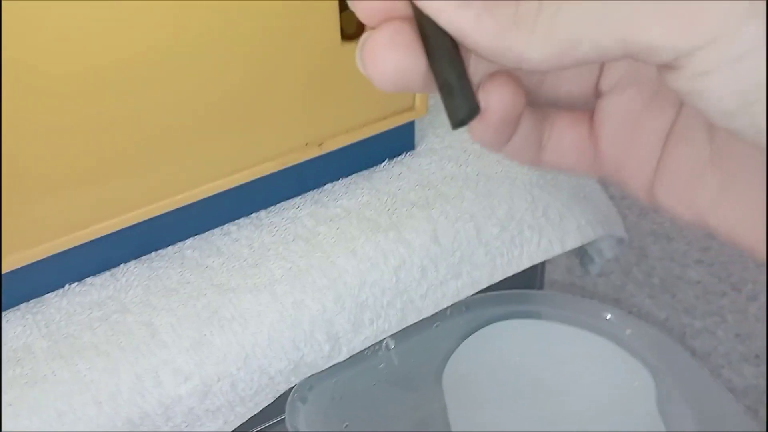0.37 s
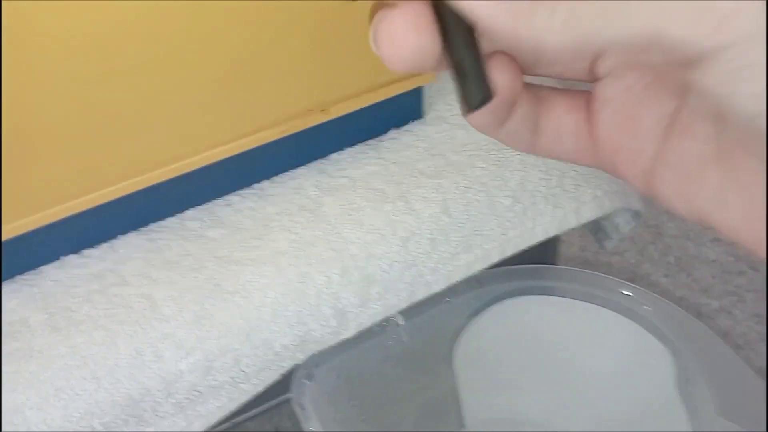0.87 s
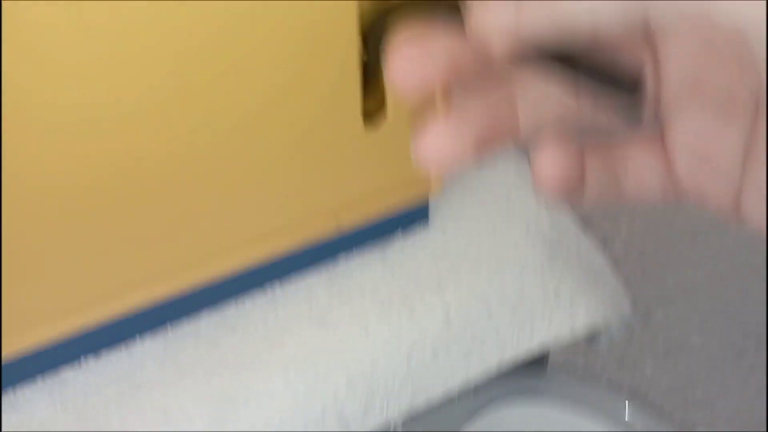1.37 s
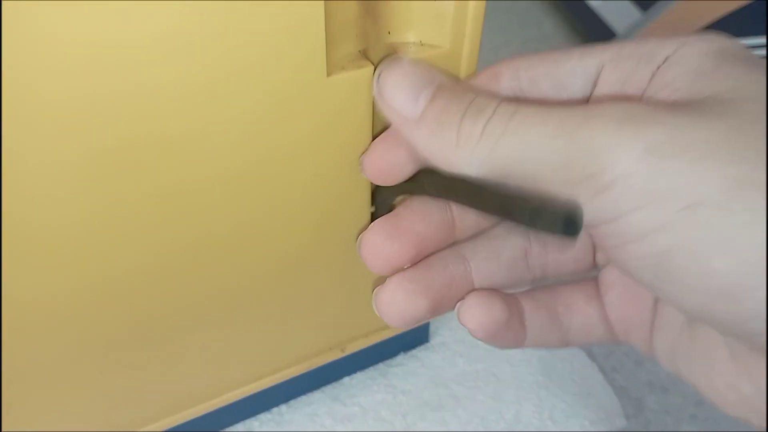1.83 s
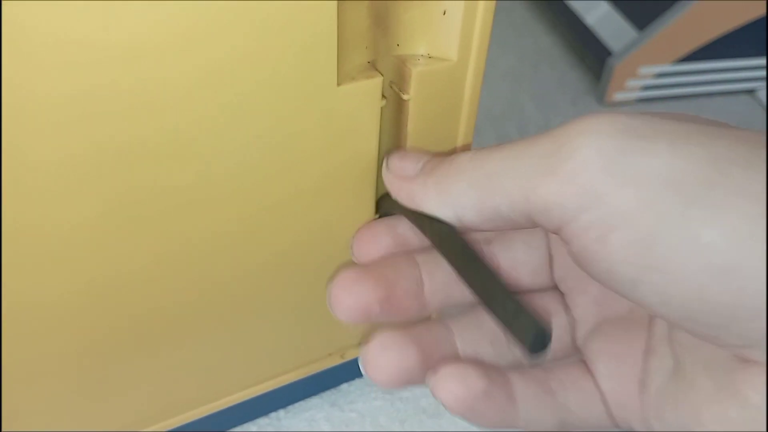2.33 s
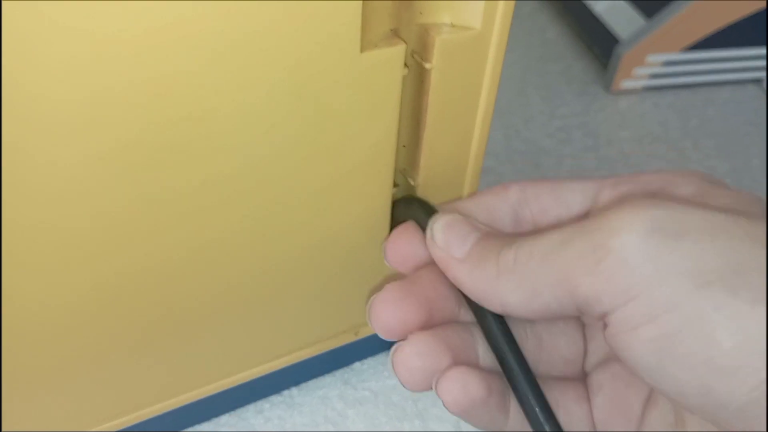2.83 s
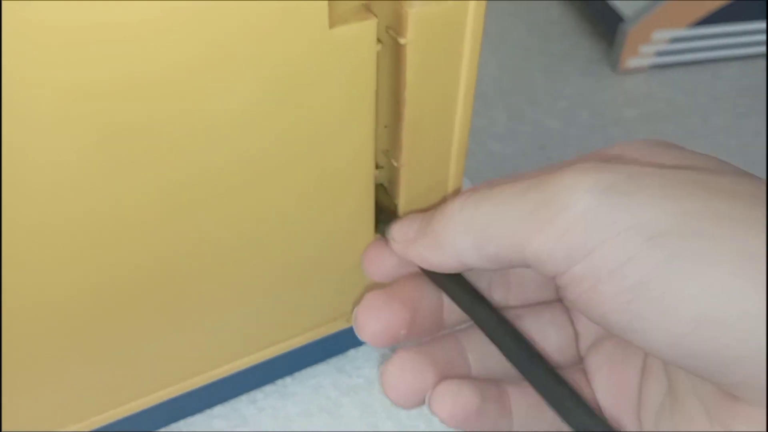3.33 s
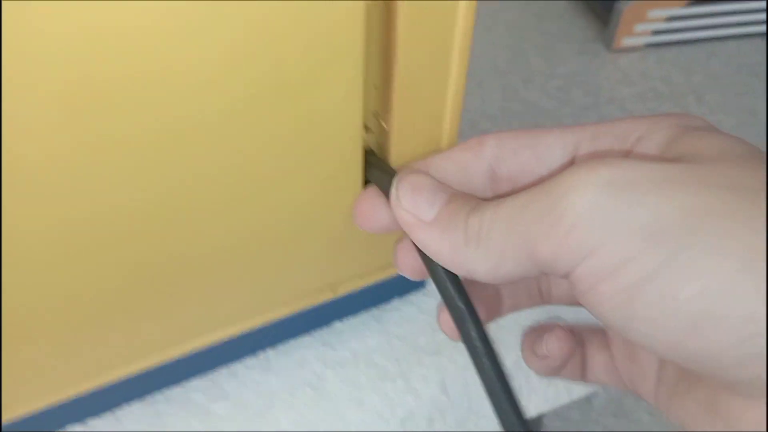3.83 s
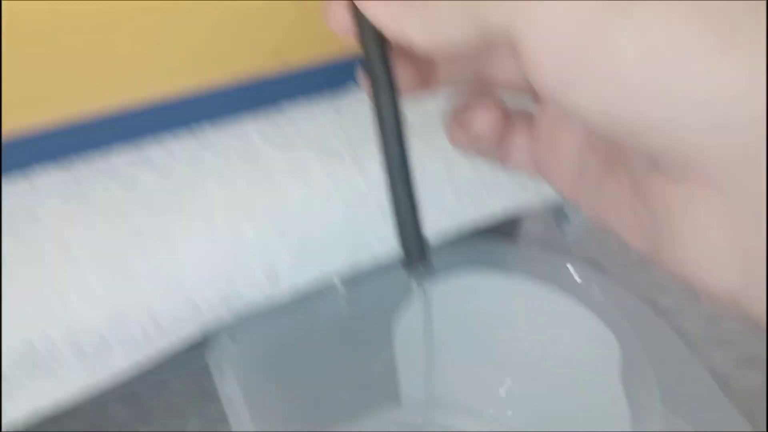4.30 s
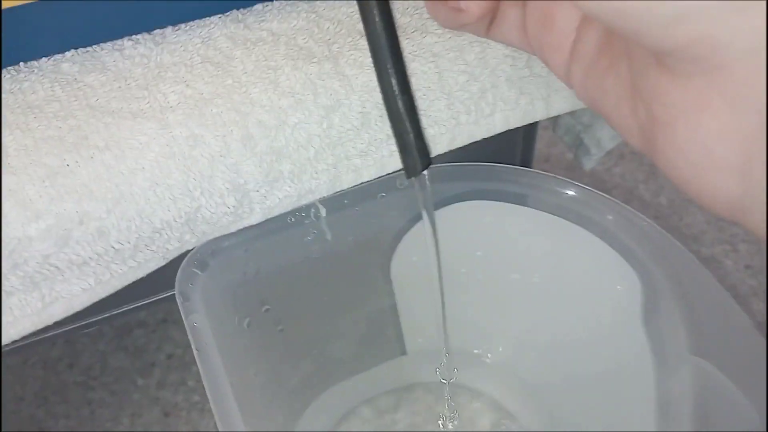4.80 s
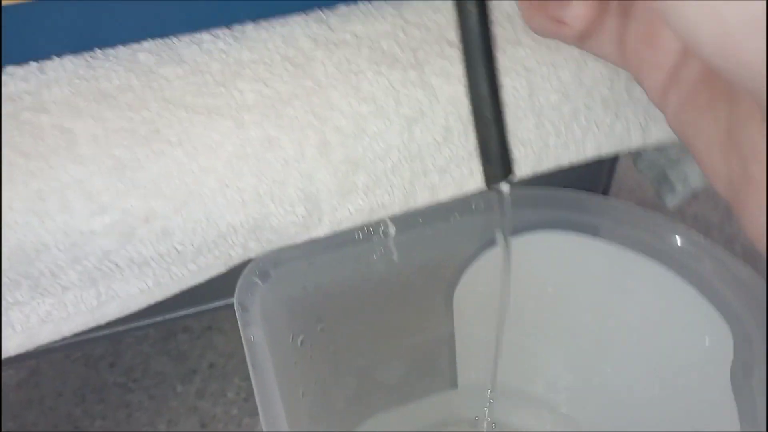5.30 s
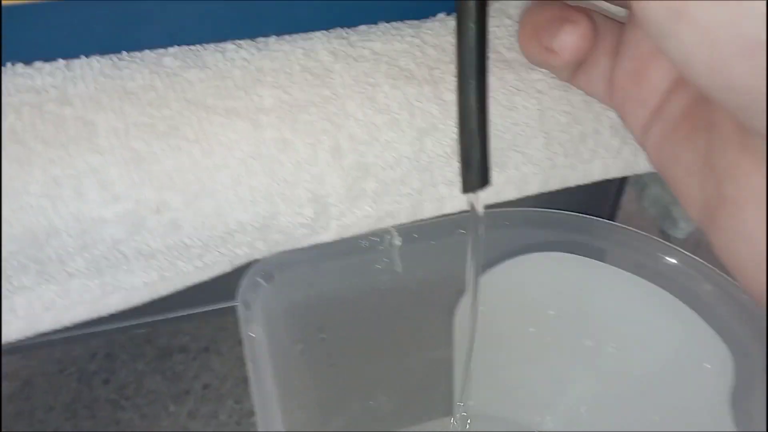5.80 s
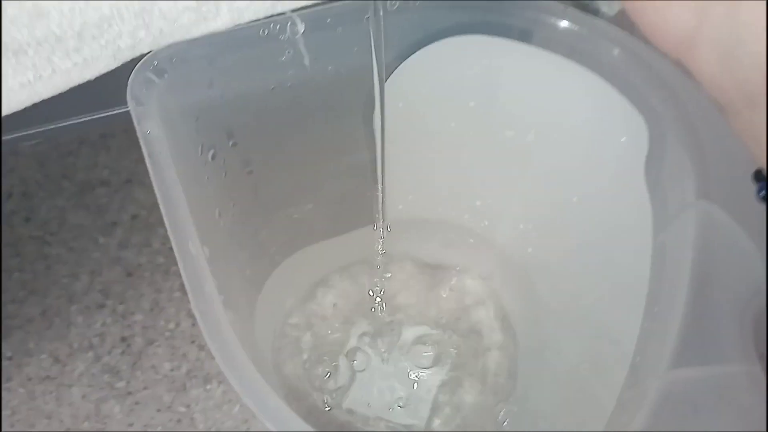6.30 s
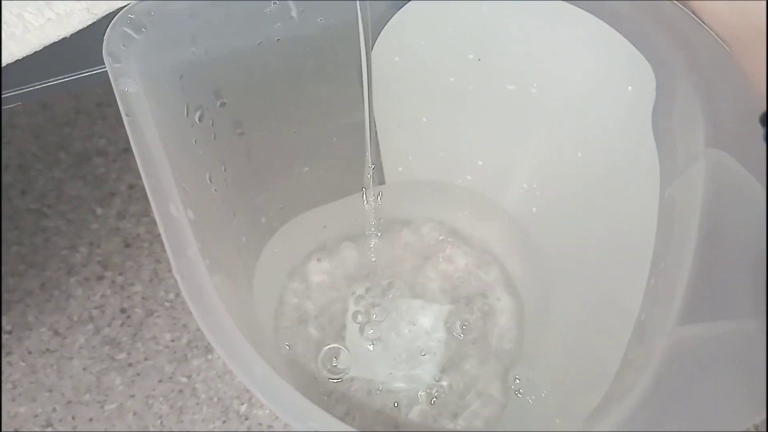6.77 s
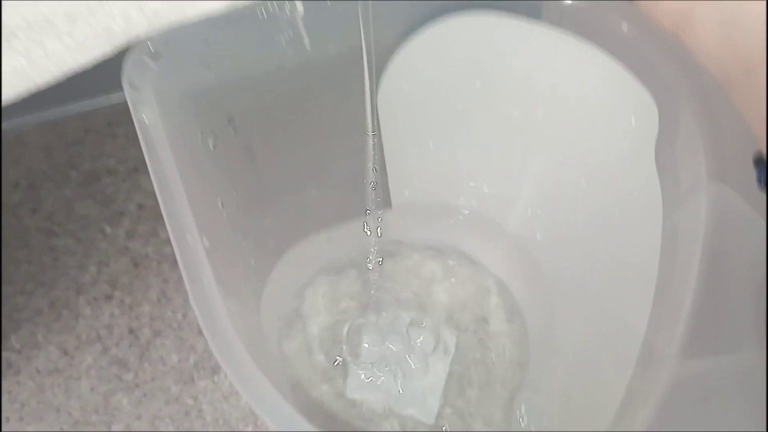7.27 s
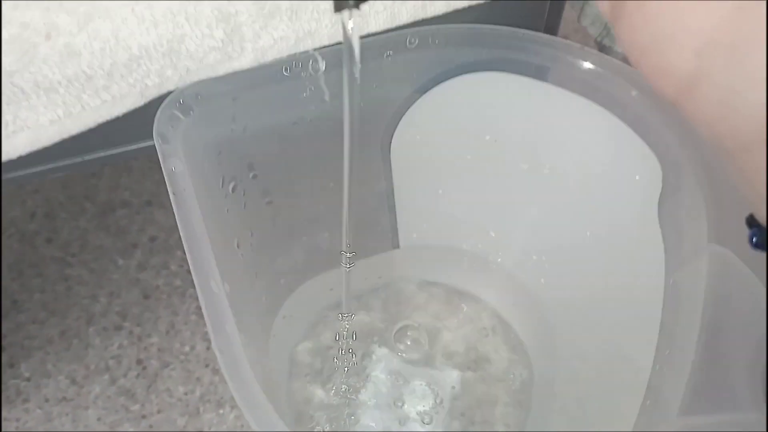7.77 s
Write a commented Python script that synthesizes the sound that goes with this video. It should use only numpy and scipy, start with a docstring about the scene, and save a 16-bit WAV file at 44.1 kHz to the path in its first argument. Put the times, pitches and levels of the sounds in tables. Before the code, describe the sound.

Faint low hum and soft skin rustles come first, with small hollow taps as a hose touches plastic. Then water abruptly starts trickling into a nearly empty plastic jug, irregular and gurgling, with many short upward-chirping bubbles, sharp little splashes and light hissing spray. It grows fuller and busier between six and seven seconds. Recorded very close in a small quiet room, slightly stronger on the left.

```python
"""A low, wavering room hum and a hand shifting on a hose, until a thin stream of water falls into a plastic jug.
Close under the phone's two microphone ports, trapped bubbles ring as gliding sines, most of them rising,
and drops spit as short bursts of filtered noise. Crowds of small bubbles, fine spray and a grainy fizz
fill the gaps; the jug's air column colours the water, and jug walls and quiet room prolong it."""
import sys
import numpy as np
from scipy import signal
from scipy.fft import rfft, irfft
from scipy.io import wavfile
from scipy.ndimage import uniform_filter1d

SR = 44100
rng = np.random.default_rng(int(sys.argv[2]) if len(sys.argv) > 2 else 0)


def volts_from_db(level):
    """Convert decibel levels to linear amplitude ratios."""
    exponent = np.asarray(level, float) / 20
    return 10 ** exponent


def wav_record(signal):
    """Record a signal, one row per channel, as 16-bit PCM in the file named by sys.argv[1]."""
    frames = np.transpose(np.atleast_2d(signal))
    bounded = np.clip(frames, -1, 1)
    # unit amplitude maps onto the largest positive 16-bit level
    quanta = np.round(bounded * 32767).astype(np.int16)
    wavfile.write(sys.argv[1], SR, quanta)


N = 347949
T = np.arange(N) / SR  # seconds

# Room air between the hum tones. Each row: frequency in Hz, relative spectrum level in dB.
ROOM_SPECTRUM = [(18, -36.5), (34, -20.5), (55, -16.5), (85, -4.5), (154, -3), (250, -8), (400, -14),
                 (620, -24), (950, -33), (1920, -35.5), (7000, -42.5), (11000, -40.5), (15000, -44.5)]
# The hum's slow wavering. Each row: time in seconds, lower tone in dB, upper tone in dB, before a 4 dB trim.
HUM_LEVELS = [(0, -81.5, -65.5), (.8, -88.5, -61), (1.2, -67.5, -55.5), (1.5, -55, -53),
              (1.85, -61.5, -64.5), (2.7, -65.5, -85), (2.9, -56, -61), (3.6, -54.5, -69.5),
              (4.0, -57, -55.5), (4.6, -60, -63), (5.0, -65, -58.5), (7.89, -69, -87.5)]
# Centre pitches of the lower and the upper hum tone, in Hz.
HUM_PITCHES = (76.11, 152.17)
# Skin and cloth rubbing near the phone. Each row: middle in seconds, level in dB, half length in seconds.
RUB_EVENTS = [(0.034, -64.5, 0.01599), (0.41, -75.5, 0.128), (1.193, -71, 0.004164), (1.332, -70.5, 0.0437),
              (1.555, -54, 0.001804), (1.599, -70.5, 0.06547), (2.141, -68.5, 0.05554),
              (2.295, -67.5, 0.08595), (2.671, -76, 0.0777), (2.97, -71.5, 0.0359), (3.291, -70, 0.1297),
              (3.489, -68.5, 0.003807), (3.86, -74, 0.1437)]
# The hose bumping the plastic housing. Each row: start in seconds, level in dB, contact pitch in Hz.
BUMP_EVENTS = [(1.556, -50.5, 375.2), (1.61, -54, 299.7), (1.783, -53, 434.2), (2.976, -44, 915.6),
               (2.3, -55, 515.9), (2.99, -51.5, 342.4), (3.306, -54, 443.8), (3.365, -52.5, 251.1),
               (3.484, -38, 352.7), (3.556, -50.5, 283.5)]
# Ringing modes of the housing. Each row: pitch in Hz, relative level in dB, 60 dB fade in seconds.
HOUSING_MODES = [(151.88, 10.5, 0.08963), (278.17, 0.5, 0.17913), (362.16, -7.5, 0.0688),
                 (457.92, -10, 0.1238), (526.74, -0.5, 0.05507), (760, -0.5, 0.02302),
                 (1683.5, -19.5, 0.2517), (1771.3, -20.5, 0.244)]
# The steady patter of the stream. Each row: time in seconds, small bubbles in dB, fine spray in dB,
# low slosh in dB, all ahead of the jug and the echoes.
STREAM_LEVELS = [(4.1, -83, -57, -70.5), (4.5, -63, -56, -71.5), (6.4, -60.5, -53.5, -67.5),
                 (7.4, -63, -57, -64), (7.89, -59.5, -55, -57.5)]
# Drops that spit on landing. Each row: time in seconds, level in dB before a 9.5 dB trim, centre pitch in Hz.
SPIT_EVENTS = [(4.0991, -27.5, 7136), (4.3, -32, 8118), (4.336, -38, 11720), (4.3545, -22, 8722),
               (4.364, -30.5, 9500), (4.3869, -23.5, 10650), (4.792, -37, 7593), (4.936, -25, 12730),
               (4.9666, -24, 9185), (5.073, -25.5, 9934), (5.111, -31.5, 6554), (5.131, -22.5, 10200),
               (5.497, -31.5, 9006), (5.6, -25.5, 9999), (5.68, -30.5, 10490), (5.709, -18, 10470),
               (5.8101, -24, 8650), (5.8778, -26.5, 9530), (5.955, -27, 10990), (6.097, -21, 11290),
               (6.199, -27, 12000), (6.375, -22.5, 10780), (6.409, -30, 7136), (6.4598, -20, 11920),
               (6.5049, -17.5, 9563), (6.569, -25.5, 9954), (6.598, -23.5, 11500), (6.704, -20.5, 7195),
               (6.7961, -27.5, 13010), (6.8078, -11.5, 9691), (6.9, -27.5, 9996), (6.9452, -18, 10850),
               (7.0228, -20, 12370), (7.0487, -25.5, 12550), (7.077, -23, 10530), (7.1527, -28, 10550),
               (7.172, -28, 12180), (7.244, -30.5, 10580), (7.2964, -32.5, 12980), (7.371, -21, 7756),
               (7.43, -24, 9900), (7.454, -24.5, 9700), (7.47, -17.5, 12060), (7.7138, -26.5, 10620),
               (7.809, -21.5, 7945)]
# The loudest air bubbles trapped by the stream. Each row: start in seconds, level in dB ahead of the jug,
# first pitch in Hz, rise in octaves per second.
BUBBLE_EVENTS = [(4.1009, -25.5, 4037, -24.5), (4.1, -22.5, 2981, 54), (4.16, -50, 1385, 4),
                 (4.163, -32, 3276, 22), (4.268, -39.5, 1155, 7.5), (4.3348, -40.5, 1441, 2),
                 (4.3876, -42.5, 1444, 0), (4.3975, -37, 5501, -10.5), (4.4608, -35.5, 899.5, 15),
                 (4.477, -39, 879.3, 9), (4.495, -53, 1890, 5.5), (4.524, -42.5, 1401, 9),
                 (4.546, -49, 1894, 16), (4.5612, -35, 2686, 27), (4.5104, -43, 888, 22.5),
                 (4.5362, -42.5, 1146, 5.5), (4.6429, -35.5, 821.3, 6), (4.6755, -36, 843, 6.5),
                 (4.7225, -40.5, 1084, 21.5), (4.7915, -32, 756.7, 17), (4.8253, -33.5, 817.7, 71.5),
                 (4.843, -40, 1313, 14), (4.862, -40.5, 1416, 4), (4.9267, -32.5, 2723, 0),
                 (4.9513, -30.5, 1376, 19.5), (5.0035, -36, 1354, 28.5), (5.0252, -36, 4426, 23),
                 (5.0238, -21.5, 3551, 25), (5.029, -31.5, 2733, -2.5), (5.0571, -38.5, 1105, 11),
                 (5.0966, -41.5, 1072, 7), (5.14, -43.5, 911.1, 2.5), (5.167, -30, 1018, -9),
                 (5.168, -33.5, 2797, 3.5), (5.2326, -31, 884.4, 40), (5.3454, -40.5, 1195, -6),
                 (5.3947, -35.5, 1060, 2), (5.436, -40, 868.8, 40), (5.4555, -38.5, 1016, 0.5),
                 (5.513, -40, 1330, -7), (5.5429, -36.5, 2684, 35), (5.6002, -35.5, 3646, 8.5),
                 (5.5992, -44, 1051, 10), (5.6209, -33, 1007, 15.5), (5.6488, -41, 1176, 29),
                 (5.761, -38.5, 3927, -0.5), (5.761, -41.5, 857.4, 6), (5.8091, -28, 3634, 54),
                 (5.813, -39, 1181, 41), (5.8468, -34, 830.1, 3.5), (5.878, -33.5, 832.8, 41),
                 (5.8798, -23, 2525, 69), (5.9068, -35.5, 811.1, 8), (5.9536, -39.5, 1476, -2.5),
                 (5.9602, -34, 1299, 29), (5.9919, -38, 1265, 7), (6.0257, -36.5, 3840, 8),
                 (6.038, -30.5, 1103, 24), (6.0641, -40, 987.6, 13), (6.1603, -32.5, 859.5, 11.5),
                 (6.1612, -31, 2240, 85), (6.141, -46, 970.2, 26.5), (6.1886, -37.5, 862.2, 0.5),
                 (6.2415, -41.5, 833.2, -2), (6.2724, -36, 934.8, -2.5), (6.311, -35.5, 3658, 26),
                 (6.3416, -30.5, 958.4, 11), (6.447, -39.5, 824.1, 2), (6.4415, -31.5, 3888, 11),
                 (6.4599, -31.5, 5428, 17.5), (6.4826, -32, 808.3, 20.5), (6.5763, -36, 764.8, 2),
                 (6.6012, -36.5, 760, 5), (6.6088, -31.5, 3793, 15), (6.6376, -25, 863, 31.5),
                 (6.6552, -42, 928.6, -3), (6.6973, -31, 2864, 53.5), (6.698, -35, 2095, 48.5),
                 (6.7135, -25.5, 6526, 11), (6.7147, -29, 1042, 28.5), (6.7975, -17.5, 5145, 20),
                 (6.8404, -27.5, 807.2, 1), (6.8638, -25.5, 882.3, 10), (6.9649, -30.5, 1048, 1.5),
                 (6.9849, -30, 970.1, 3), (7.0206, -35, 955.8, 33), (7.0213, -34, 3089, 16),
                 (7.0311, -29, 883.6, 25), (7.0548, -40, 966.8, 39), (7.0781, -33, 925.4, 5.5),
                 (7.11, -36, 955.2, 0), (7.195, -46, 937.6, 2.5), (7.1996, -41, 5281, 1),
                 (7.226, -39, 911.2, 10.5), (7.247, -43, 901.5, 7.5), (7.2967, -39.5, 2426, 37.5),
                 (7.2834, -32, 794.7, 40), (7.3096, -37, 943.8, 9.5), (7.371, -31, 2219, 16),
                 (7.3837, -37, 730.4, 34.5), (7.3984, -38, 992.6, -1), (7.4536, -36.5, 910.1, 7.5),
                 (7.5138, -35, 904.2, 57), (7.5438, -36.5, 4945, 0), (7.585, -37.5, 1984, -3),
                 (7.556, -35.5, 2286, -1), (7.6178, -34.5, 1277, -6.5), (7.6228, -38.5, 1929, 18.5),
                 (7.644, -40, 1144, -20), (7.686, -47, 840, -4), (7.7134, -40, 829.5, 5),
                 (7.7141, -23.5, 2257, 5.5), (7.7427, -29, 834.4, 37.5), (7.7859, -32.5, 930.5, 32.5),
                 (7.821, -38, 1031, 8), (7.851, -44, 976.6, -1.5), (7.875, -45, 991.7, 2)]
# Resonances of the air column above the water. Each row: pitch in Hz, width in Hz, level in dB.
JUG_MODES = [(628.2, 87.1, 2), (2114.3, 359.07, 0.5), (5157.5, 730.8, 2)]

ROOM_DB = -63
TAIL_T60_S, TAIL_DB = 0.22, -15  # the room's echoes
TAIL_DAMP = 0.69357  # one-pole dulling of the room's tail, 0-1
TICK_HZ, TICK_DB, TICK_T60_S = 1513.3, -16, 0.02462  # dry tick that opens each bump
SLOSH_WANDER_DB = 5
FIZZ_DB, FIZZ_GRAIN_DB = -7.5, 4.5  # level relative to the spray; spread of its grain
SWARM_S = 0.04  # mean lag of small events behind a loud bubble or drop
PINGS_DB = -1  # the smallest, highest bubbles, relative to the small ones
RING_TURNS = 73.827  # turns in which a 1 kHz bubble fades 60 dB
TURNS_FALL = 0.11402  # higher bubbles ring fewer turns: power of pitch over 1 kHz
TOP_HZ = 14200  # above this the phone hears little


def unit(x):
    """Scales a sound to rms 1."""
    return x / np.sqrt(np.mean(x ** 2))


def curves(table):
    """Draws each column of a table along the time axis; very quiet before its first row."""
    s, *columns = np.transpose(table)
    return [np.interp(T, s, c, left=-140) for c in columns]


def peak(x, hz, width):
    """Two-pole resonance, gain 1 at the centre."""
    b, a = signal.iirpeak(min(hz, .4 * SR), hz / width, fs=SR)
    return signal.lfilter(b, a, x)


def shaped(points):
    """Noise with the spectrum of (Hz, dB) points, joined over log frequency."""
    hz, db = np.transpose(points)
    f = np.arange(N // 2 + 1) * SR / N + 1
    gain = volts_from_db(np.interp(np.log(f), np.log(hz), db))
    return unit(irfft(rfft(rng.standard_normal(N)) * gain, N))


def walk(rate):
    """Slow chance, spread 1, heading for a new value rate times a second."""
    k = int(SR / rate)
    steps = np.repeat(rng.standard_normal(N // k + 1), k)
    return unit(uniform_filter1d(steps, k)[:N])


def add(out, s, sound):
    """Mixes a short sound in at time s."""
    i = int(s * SR)
    part = sound[..., :N - i]
    out[..., i:i + part.shape[-1]] += part


def room():
    """Two wavering hum tones alike at both ports, a drifting low murk half alike, a thin hiss unrelated."""
    tones = np.zeros(N)
    for hz, db in zip(HUM_PITCHES, curves(HUM_LEVELS)):
        turns = hz * np.cumsum(1 + 0.008429 * walk(3.3)) / SR
        tones += volts_from_db(db - 4.0) * np.sin(2 * np.pi * turns)
    side = shaped(ROOM_SPECTRUM)
    # less difference between the ports in the lows
    side = side - 0.6431 * peak(side, 170.0, 700.0)
    air = shaped(ROOM_SPECTRUM) + side * np.array([[1], [-1]])
    drift = (volts_from_db(2.5 * walk(4)) - 1) * peak(air, 400., 500.)
    return tones + volts_from_db(ROOM_DB) * (air + drift)


def echoes(x, t60, db, start_s, damp):
    """A dense fading tail, different at each port and duller than the direct sound."""
    t = np.arange(int(t60 * SR)) / SR
    dull = signal.lfilter([1], [1, -damp], rng.standard_normal((2, len(t))))
    tail = dull * volts_from_db(-60 * t / t60) * (t > start_s)
    tail = tail / np.sqrt(np.sum(tail ** 2, axis=1, keepdims=True))
    return volts_from_db(db) * signal.fftconvolve(x, tail, axes=1)[:, :N]


def rubbing():
    """Grainy friction hiss in three broad bands that swells and fades with each rub."""
    grain = rng.standard_normal((2, N)) * volts_from_db(2.809 * np.array([walk(210), walk(410)]))
    swell = sum(volts_from_db(db) * np.exp(-((T - s) / half_s) ** 2) for s, db, half_s in RUB_EVENTS)
    high = peak(grain, 9448.0, 4200.0)
    middle = 1.1925 * peak(grain, 1922.4, 4284.0)
    low = 4.981 * peak(grain, 521.2, 200.8)
    return swell * unit(high + middle + low)


def bumps():
    """Each bump ticks and rings the housing's modes, most those near the pitch of its contact."""
    out = np.zeros(N)
    t = np.arange(8192) / SR
    for s, db, contact_hz in BUMP_EVENTS:
        ring = np.zeros(len(t))
        for hz, mode_db, t60 in HOUSING_MODES:
            off_contact_db = 7.938 * np.log2(hz / contact_hz) ** 2
            ring += volts_from_db(mode_db - off_contact_db - 60 * t / t60) * np.sin(2 * np.pi * hz * t)
        tick = unit(peak(rng.standard_normal(len(t)), TICK_HZ, 513.0))
        ring += volts_from_db(TICK_DB - 60 * t / TICK_T60_S) * tick
        add(out, s, volts_from_db(db) * ring * (1 - np.exp(-t * contact_hz)))
    return out


def slosh():
    """The churned water sloshes low against the plastic: noise in one low resonance."""
    return unit(peak(rng.standard_normal(N), 294.97, 133.8))


def fizz():
    """Countless tiny bubbles merge into a fine, grainy hiss that fills the gaps."""
    grain = rng.standard_normal((2, N)) * volts_from_db(FIZZ_GRAIN_DB * walk(270))
    return unit(peak(grain, 2014.6, 2000.0) + 1.418 * peak(grain, 13045.0, 6427.0))


def swarm(count):
    """Times for small events, which crowd behind the loud bubbles and drops as the stream breaks into gulps."""
    pick, lag = rng.random((count, 2)).T
    starts = np.array([row[0] for row in BUBBLE_EVENTS + SPIT_EVENTS])
    leaders = starts[(pick * len(starts)).astype(int)]
    return np.clip(leaders - SWARM_S * np.log(1 - lag), 0, T[-1])


def spit(db, hz, rise_s, width, broad):
    """A drop bursts into a few milliseconds of crackle: a ring at its own pitch over a broad hiss."""
    t = np.arange(768) / SR
    same, left, right = rng.standard_normal((3, len(t)))
    # the part both ports share reaches the right one two samples later
    ears = np.array([same + 2.6114 * left, np.roll(same, 2) + 3.307 * right])
    ring = unit(peak(peak(ears, hz, width), hz, width))
    crackle = ring + broad * unit(peak(ears, 7786.0, 13513.0))
    fade = (t / rise_s * np.exp(1 - t / rise_s)) ** 1.075
    # the left port faces the jug and hears more of the highest pitches
    pan_db = 0.779 + 20.88 * max(np.log2(hz / 9366.0), 0)
    return volts_from_db(db + np.array([[pan_db], [-pan_db]]) / 2) * fade * crackle


def spray(count):
    """Many fainter drops of scattered pitch and length, crowding behind the loud events."""
    out = np.zeros((2, N))
    for s, (pitch, size, length) in zip(swarm(count), rng.random((count, 3))):
        db = 19.502 * size ** 2.159
        hz = 5256.9 * 2 ** (1.35 * pitch ** .7)
        rise_s = 0.0004344 + 0.0035173 * length ** 2
        add(out, s, spit(db, hz, rise_s, 2460.0, 0.4254))
    return unit(out)


def spits():
    """The loud drops, each a short crackle around its own pitch."""
    out = np.zeros((2, N))
    for s, db, hz in SPIT_EVENTS:
        add(out, s - .0004, spit(db - 9.5, hz, rise_s=0.0008195, width=3619.0, broad=0.489))
    return out


def bubble(db, hz, t60, rise, swell_turns=0.1945, hold=1.0155, burst_octaves=1.0, wobble_db=3.0):
    """A sine that glides, upward as a bubble nears the surface, flutters in the churned water and bursts."""
    t = np.arange(int(max(t60, .004) * SR)) / SR
    octaves = rise * t
    pitch = np.minimum(hz * 2 ** octaves, .4 * SR)
    # a fresh chance level every 3.3645 turns of the first pitch
    flutter_db = wobble_db * np.interp(t, np.arange(128) * 3.3645 / hz, rng.standard_normal(128))
    # 20 dB down once the pitch has moved by burst_octaves
    burst_db = -20 * (octaves / burst_octaves) ** 4
    swell = 1 - np.exp(-t * hz / swell_turns)
    fade = volts_from_db(db - 60 * (t / t60) ** hold + burst_db + flutter_db) * swell
    return fade * np.sin(2 * np.pi * np.cumsum(pitch) / SR)


def patter(count, low_hz, octaves, skew, turns, scatter_db):
    """A crowd of small unlisted bubbles, each ringing for some turns; skew above 1 makes most of them low."""
    out = np.zeros(N)
    for s, (pitch, size, rise) in zip(swarm(count), rng.random((count, 3))):
        hz = low_hz * 2 ** (octaves * pitch ** skew)
        db = scatter_db * size - 6. * pitch
        add(out, s, bubble(db, hz, turns / hz, 31.166 * rise ** 2 * hz / low_hz))
    return unit(out)


def bubbles():
    """The loud bubbles, each opened by the brief hiss of the drop that traps it."""
    out = np.zeros(N)
    t = np.arange(512) / SR
    for s, db, hz, rise in BUBBLE_EVENTS:
        t60 = RING_TURNS / hz * (1000 / hz) ** TURNS_FALL
        add(out, s, bubble(db, hz, t60, rise))
        hiss = peak(rng.standard_normal(len(t)), 9300.0, 8933.0)
        add(out, s - .001, volts_from_db(db - 18) * hiss * t / 0.0004447 * np.exp(-t / 0.0020427))
    return out


def scene():
    """Water inside the jug, the jug inside the room, the phone held just above."""
    small_db, spray_db, slosh_db = curves(STREAM_LEVELS)
    small = patter(count=700, low_hz=852.0, octaves=1.5, skew=1.8095, turns=97.67, scatter_db=18.0)
    pings = patter(count=1300, low_hz=1751.4, octaves=1.902, skew=0.79305, turns=65.92, scatter_db=14.0)
    water = bubbles() + volts_from_db(small_db) * small + volts_from_db(small_db + PINGS_DB) * pings
    # such small bodies radiate no bass
    no_bass = signal.butter(N=2, Wn=520., btype="high", fs=SR, output="sos")
    water = signal.sosfilt(no_bass, water)
    water = water + volts_from_db(slosh_db + SLOSH_WANDER_DB * walk(25)) * slosh()
    # the air column above the water rings with every bubble
    column = sum(volts_from_db(db) * peak(water, hz, width) for hz, width, db in JUG_MODES)
    water = 0.72333 * water + column
    # the right port hears the water weaker and two samples later
    near = np.array([volts_from_db(-0.0419) * water, volts_from_db(-3.0) * np.roll(water, 2)])
    near = near + spits() + volts_from_db(spray_db) * (spray(count=550) + volts_from_db(FIZZ_DB) * fizz())
    jug_walls = echoes(near, t60=.015, db=-15.0, start_s=.001, damp=.4)
    near = near + jug_walls + bumps() + rubbing()
    return near + echoes(near, TAIL_T60_S, TAIL_DB, 0.0078, TAIL_DAMP) + room()


def roll_off(x):
    """The treble ends steeply here."""
    return signal.sosfilt(signal.butter(12, 16510, fs=SR, output="sos"), x)


def record(dry):
    """The phone's microphones: a steep low-pass leaves the highest treble 45 dB down."""
    low_pass = signal.butter(N=10, Wn=TOP_HZ, fs=SR, output="sos")
    cut = signal.sosfiltfilt(low_pass, dry)
    mix = cut + volts_from_db(-45) * (dry - cut)
    return roll_off(mix)


dry = scene()
out = record(dry)
wav_record(out)
```